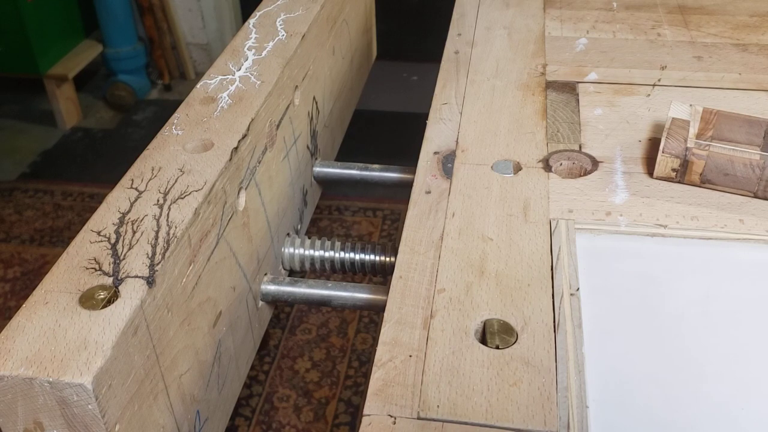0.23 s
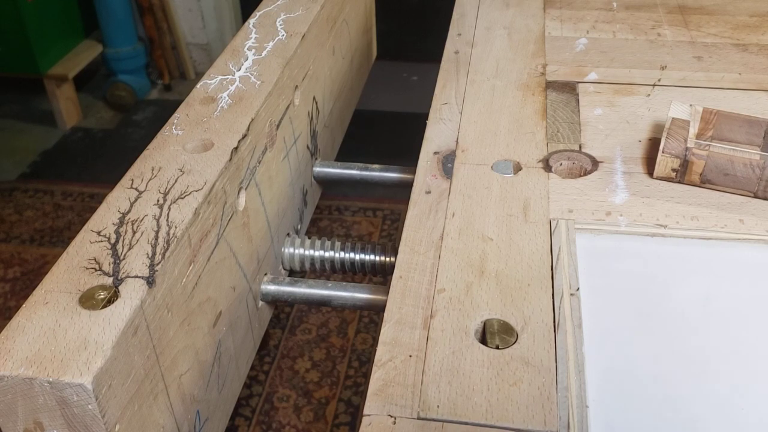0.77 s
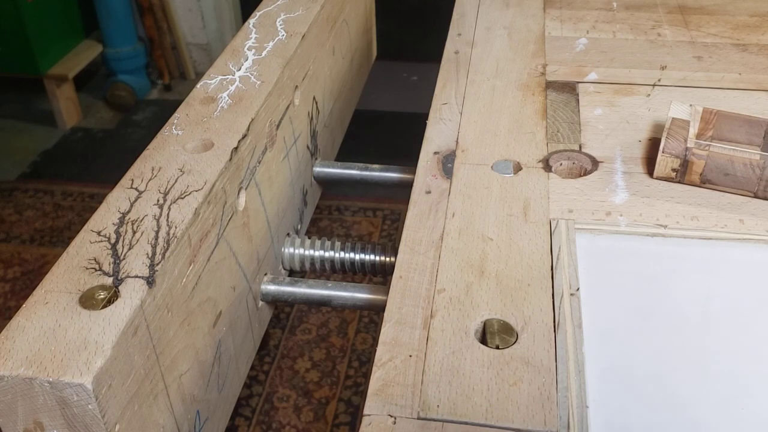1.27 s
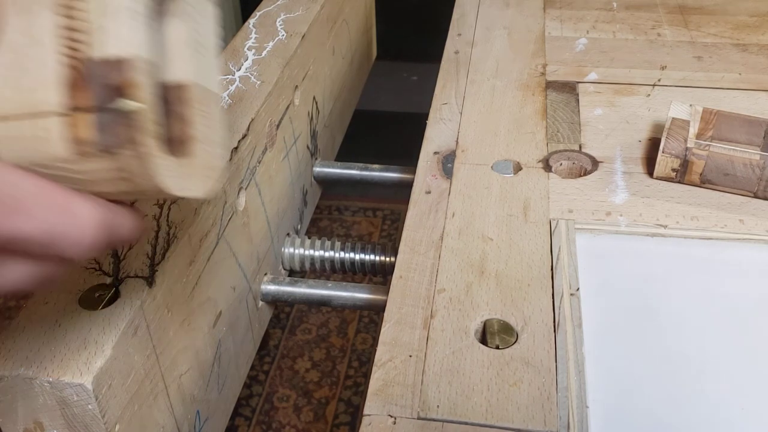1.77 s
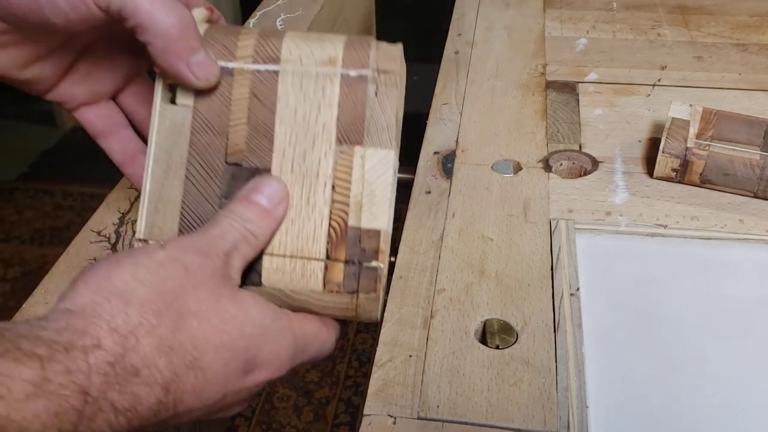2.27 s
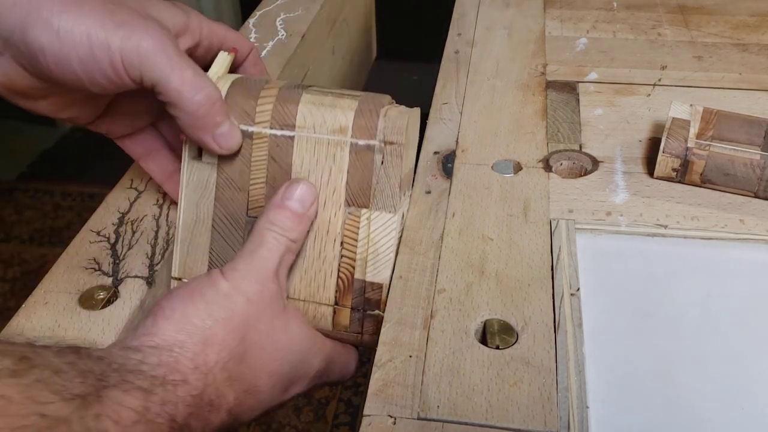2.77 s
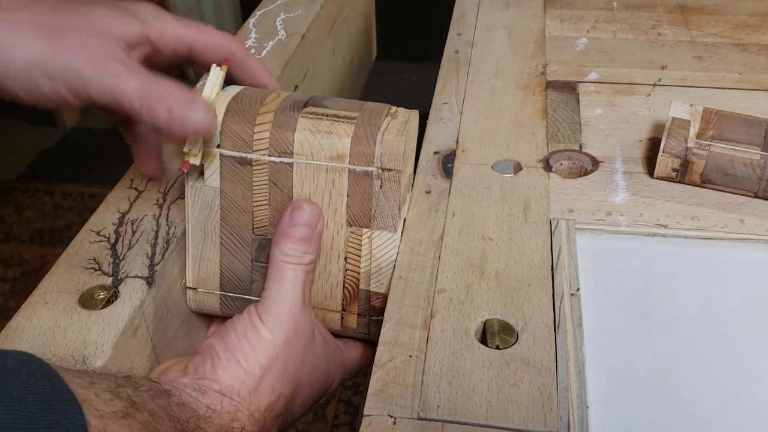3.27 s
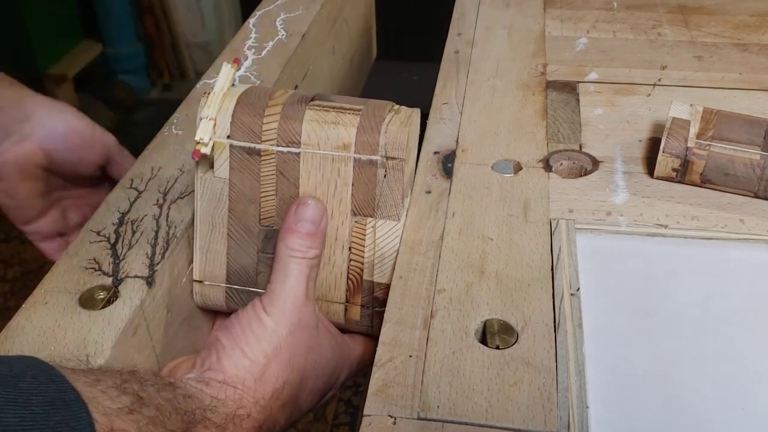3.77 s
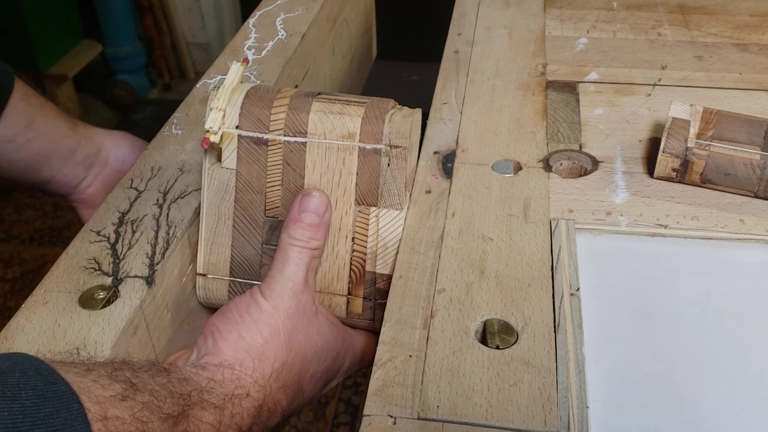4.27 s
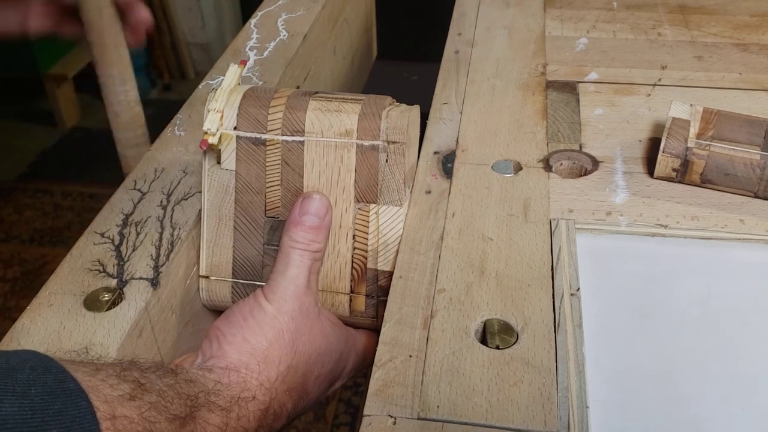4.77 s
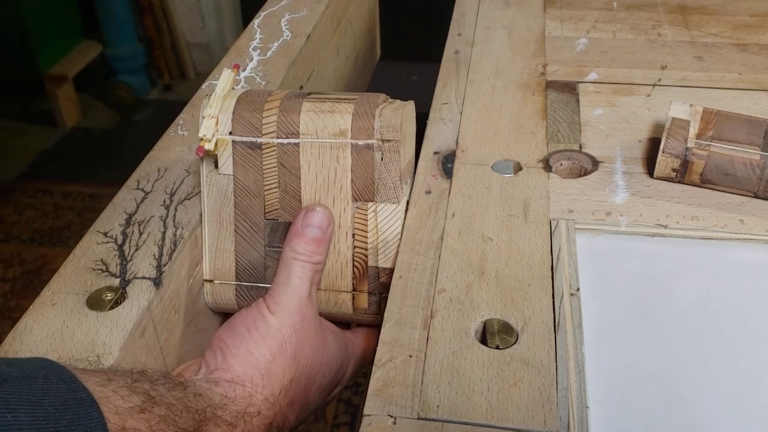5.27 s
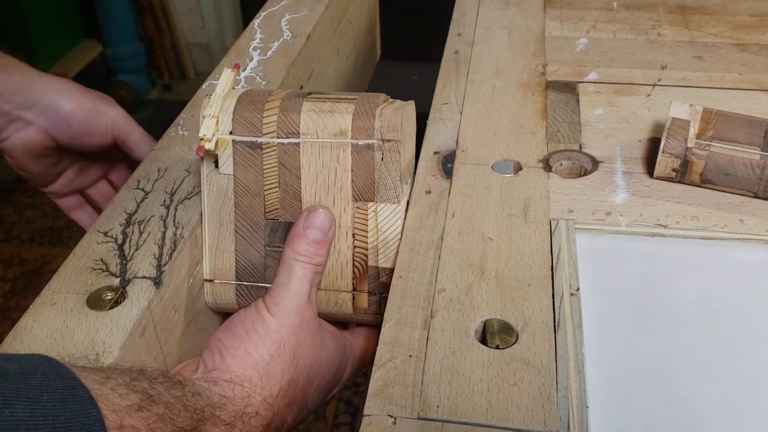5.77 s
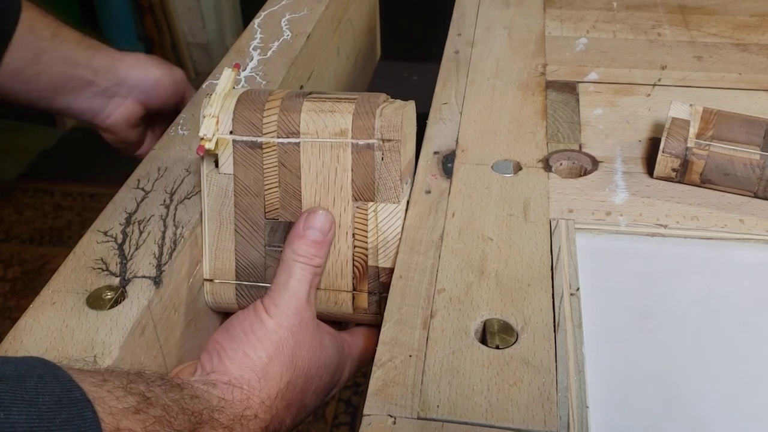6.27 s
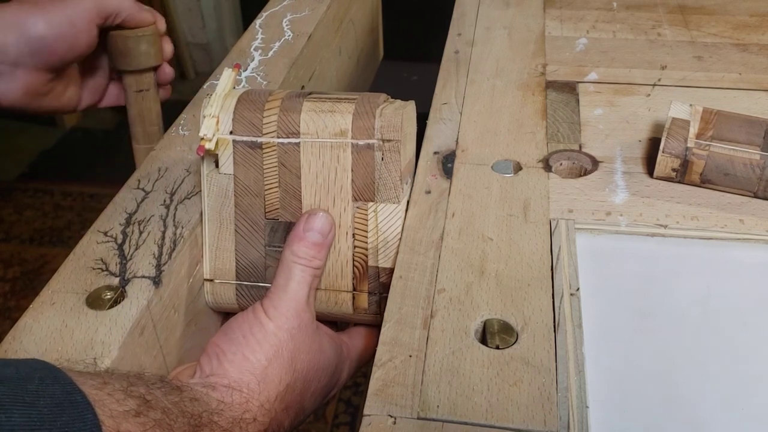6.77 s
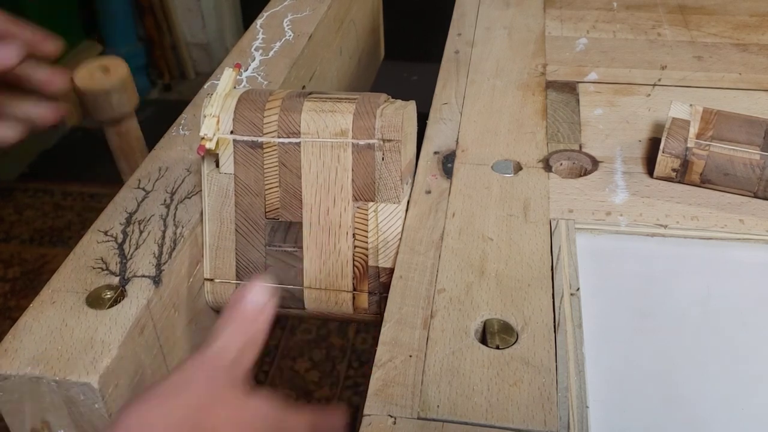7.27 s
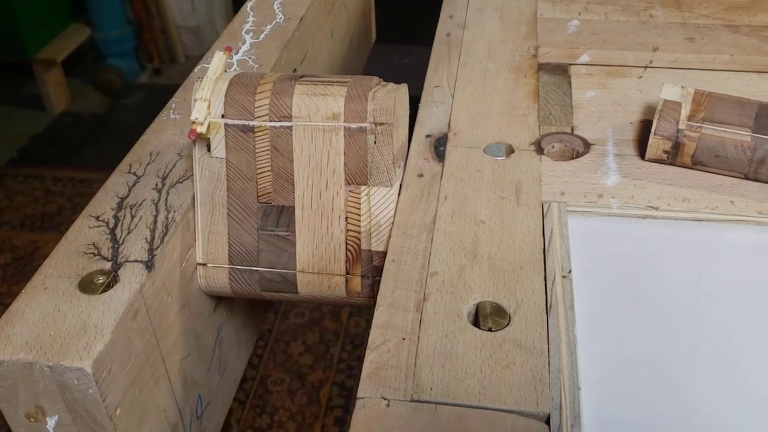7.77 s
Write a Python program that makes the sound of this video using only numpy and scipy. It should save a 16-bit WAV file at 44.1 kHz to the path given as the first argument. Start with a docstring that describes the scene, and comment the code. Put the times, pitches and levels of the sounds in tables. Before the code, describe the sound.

Over a low workshop hum, faint handling, a wooden tap, dull handle knocks, a rumbling screw scrape, then one loud wooden crack and small bounces.

```python
"""Wooden block in a workbench vise

Friction is dense random slips, filtered and gated by each movement; blows are scattered bursts plus
decaying modes. A block is handled and slid between the jaws over a low workshop hum. The vise screw is
turned twice with a scraping rumble and a faint whine of its thread; the wooden handle knocks and rubs in
its hub, slides through the hand, and at last drops against its end cap and bounces to rest."""
import sys
import numpy as np
from scipy import signal
from scipy.fft import rfft, irfft, next_fast_len
from scipy.io import wavfile

SR = 44100
rng = np.random.default_rng(int(sys.argv[2]) if len(sys.argv) > 2 else 0)


def transcribe(u):
    """Save the signal u as a 16-bit wav file named by the first command-line argument.

    u: samples, shape (n,) or (channels, n), limited to [-1, 1]; the rate is SR.
    q: integer samples, one column per channel.
    """
    v = np.clip(np.atleast_2d(u).T, -1, 1)
    q = np.round(v * 32767).astype(np.int16)
    wavfile.write(sys.argv[1], SR, q)


N = 353682
SIZE = next_fast_len(N, True)
TIME_S, FREQ_HZ = np.arange(N) / SR, np.fft.rfftfreq(SIZE, 1 / SR)

# Motor and mains hum. Each row: frequency in Hz, rms level in dB, waver in dB.
HUM = [(75.3, -45, 2), (119.9, -45, 1), (252.5, -62, 2.5)]
# Spectrum of the still workshop air. Each row: frequency in Hz, relative density in dB per Hz.
AIR = [(20, -25), (33, -22.5), (50, 1.5), (90, -1.5), (135, -5.5), (165, -10), (205, -12), (250, -11),
       (350, -20), (600, -29.5), (850, -30), (1500, -42.5), (3200, -50.5), (5300, -51), (7600, -65),
       (12500, -50), (16000, -51.5)]
# Left-right likeness of the air. Each row: frequency in Hz, correlation from -1 to 1.
AIR_ALIKE = [(60, 0.93), (130, 0.8), (290, 0.66), (640, 0.26), (1410, -0.28), (3100, -0.04), (6820, -0.19),
             (15000, 0.59)]

# Fingers on wood. Each row: frequency in Hz, relative level in dB.
RUB = [(600, -4), (1400, 2), (2350, 2), (3500, -4), (5000, -3), (6500, -7), (8000, -9), (16000, -25)]
# Hiss of dry skin. Each row: frequency in Hz, relative level in dB.
SKIN = [(3000, -30), (5000, -15), (7500, -24.5), (10000, -6.5), (13000, -6), (16000, -5)]
# Resonances of the hand-held block. Each row: frequency in Hz, -6 dB width in Hz, relative level in dB.
HELD = [(1390, 110, 3), (1930, 130, 4.5), (2440, 70, 2), (2840, 120, 6), (4700, 400, 3)]
# Fingers shifting on the block. Each row: start in seconds, length in seconds, rub level in dB,
# skin hiss level in dB, brightest frequency in Hz.
TOUCHES = [(0, .035, -63, -56, 4500), (.06, .1, -73, -75, 1400), (.22, .15, -70, -72, 1400),
           (.48, .11, -73, -67, 5500), (.612, .022, -60, -59, 2600), (.625, .05, -68, -67, 2000),
           (.79, .1, -70, -85, 2000), (.92, .06, -62, -68, 4700), (1.0, .1, -66, -76, 2500),
           (1.21, .05, -69, -66, 4700), (1.27, .06, -68, -66, 2800), (7.0, .13, -74, -74, 5000),
           (7.19, .045, -79, -78, 5000)]
# Small ticks of wood and fingers. Each row: time in seconds, level in dB, centre in Hz,
# distance to -6 dB in octaves.
TICKS = [(.622, -21, 3000, 1.1), (.624, -23, 12000, 0.43), (.659, -26, 9000, 1.3),
         (1.135, -30, 11000, 0.35), (1.322, -32, 10000, 1), (2.769, -1, 1470, .22),
         (2.770, -16, 3400, 0.58), (3.305, -22, 5500, .2), (3.305, -18, 2350, .1), (5.456, -28, 8350, 0.62),
         (5.577, -35, 7000, 0.69), (5.678, -32, 10600, 0.17)]

# Pushes of the block between the jaws. Each row: start in seconds, length in seconds, scuff level in dB,
# squeak level in dB.
PUSHES = [(2.27, .04, -76, -90), (2.42, .09, -77, -63), (2.5, .11, -63.5, -62), (2.64, .05, -67, -68),
          (2.755, .025, -59, -60), (2.78, .08, -68, -67), (2.87, .06, -66, -68), (2.99, .11, -76, -72),
          (3.16, .12, -71, -78), (3.28, .05, -67, -73)]
# Resonances of the block between the jaws. Each row: frequency in Hz, -6 dB width in Hz,
# relative level in dB.
BLOCK = [(1690, 160, -1.5), (2290, 110, -5), (2830, 180, -1), (3430, 260, -4), (3920, 150, -6),
         (4500, 400, -2), (5280, 350, -3), (4000, 3500, -9)]
# Groans of the block binding against a jaw. Each row: start in seconds, length in seconds, level in dB.
GROANS = [(2.44, .06, -40), (2.55, .1, -47)]

# Blows of the handle and jaw. Each row: time in seconds, force in dB, contact corner in Hz,
# fall above it in dB per octave, bench ring in dB, thud in Hz, thud level in dB,
# thud pan in dB left minus right, note of the struck part in Hz, note level in dB.
KNOCKS = [(4.153, -23, 4200, 10, -1, 89.4, -28.5, -4, 410, -34),
          (4.166, -22, 2400, 12, -6, 165, -33, 0, 1650, -38),
          (4.417, -10.5, 1080, 24, -14, 179, -36, 0, 560, -36),
          (4.431, -14, 1000, 20, -16, 171, -29, -6, 690, -32),
          (4.440, -8.5, 1400, 14, -22, 140, -24, -7, 870, -30),
          (4.447, -22, 1300, 20, -22, 272, -20, -6, 780, -35),
          (4.5575, -13.5, 1400, 12, -12, 180.5, -29, 3, 1130, -31),
          (5.299, -23, 1850, 28, 2, 170, -31, 0, 430, -33),
          (6.128, -27, 1600, 11, -8, 132, -40, 0, 1650, -48),
          (6.208, -9, 1600, 13, -9, 125, -38, 0, 670, -26),
          (6.221, -17, 1300, 14, -10, 165, -42, 0, 850, -32),
          (6.231, -16, 1300, 14, -10, 90, -32, 0, 700, -32),
          (7.392, -24, 800, 11, -10, 120, -42, 0, 860, -38),
          (7.419, -15, 1100, 12, -10, 160, -37, 0, 610, -29),
          (7.4537, 0.5, 14000, 5, -1, 132, -22, 0, 640, -18),
          (7.530, -11.5, 2400, 9, 6.5, 155, -24, 0, 2130, -26),
          (7.652, -42, 400, 20, 10, 165, -39, 0, 380, -48)]
# Modes of the bench and vise. Each row: frequency in Hz, relative level in dB, t60 in seconds.
BENCH = [(53, -31, .6), (258, -23, .35), (345.4, -19, .14), (381, -10.5, .15), (522, -23, 0.18),
         (646.5, -22, .15), (730, -29, .12), (861, -30, .12), (940, -26, .1), (1078, -30, .15),
         (1465, -33, .16), (1662, -29, 0.12), (2070, -30, .13), (2150, -33, .2), (2640, -34, .11),
         (3535, -28, 0.065), (3700, -35, .2), (3855, -28, .12), (4300, -27, .1), (4555, -24, 0.067),
         (4615, -26, .1), (4750, -25, 0.12), (5085, -27, .1)]
# Dense response of the wood between its modes. Each row: frequency in Hz, gain in dB.
WOOD = [(40, 1), (200, 15), (480, 15), (650, 23), (1100, 16.5), (1400, 19), (1850, 13.5), (2200, 17),
        (2900, 10), (4000, 18), (4900, 21), (6200, 10), (7500, -5), (10000, 3), (16000, -2)]

# Pulls on the vise handle and its last slide through the hub. Each row: start in seconds,
# length in seconds, time to full speed in seconds, scrape level in dB, rumble level in dB.
TURNS = [(4.18, .17, .1, -64, -38), (4.33, .15, .08, -58, -38), (4.56, .16, .05, -67, -44),
         (6.06, .06, .04, -56, -40), (6.105, .325, .035, -43, -28.5), (6.66, .14, .08, -61, -46),
         (6.99, .07, .03, -64, -44), (7.35, .09, .1, -45, -51)]
# Rough floor of the scrape. Each row: frequency in Hz, relative level in dB.
SCRAPE = [(150, -18), (300, -5), (520, 0), (800, 1), (1100, -1), (1750, -8), (2100, -18), (3300, -24),
          (4900, -24), (6000, -30), (7500, -42), (10000, -38), (16000, -42)]
# Resonances of the vise under the scrape. Each row: frequency in Hz, -6 dB width in Hz,
# relative level in dB.
VISE = [(377, 30, 13), (668, 70, 5), (1270, 100, -1), (1630, 140, -6), (2430, 80, -15), (2780, 100, -14),
        (3910, 130, -14), (4640, 220, -15), (5080, 110, -15)]
# Judder of the jaw. Each row: frequency in Hz, relative level in dB.
RUMBLE = [(20, -34), (45, -4), (90, 5), (130, -1), (175, 0.5), (250, -14), (400, -23.5), (900, -68.5)]
# Whine of the steel thread. Each row: frequency in Hz, level in dB.
THREAD = [(6498, -76), (8452, -78), (12721, -84)]

# Decay of the room. Each row: frequency in Hz, t60 in seconds.
ROOM_T60_S = [(100, 1), (300, 0.49), (1000, 0.24), (2200, .33), (4500, .26), (12000, .22)]
# Stereo balance of the bench sounds. Each row: frequency in Hz, left minus right in dB.
LEAN = [(25, 2), (60, 18.5), (130, 9), (380, 6), (700, -2), (1300, -4), (2400, 2.5), (4500, -4.5),
        (8000, 4), (15000, 3)]
# Left-right likeness of the bench sounds. Each row: frequency in Hz, correlation.
ALIKE = [(60, 0.6), (380, 0.5), (800, 0.4), (1500, 0.03), (16000, 0)]


def amp(db):
    """Decibels to gain."""
    return np.exp(np.asarray(db) * (np.log(10) / 20))


def unit(x):
    """Scales to rms 1."""
    return x / np.sqrt(np.mean(x ** 2) + 1e-20)


def read(points, hz):
    """Interpolates a table on a log-frequency axis."""
    table_hz, value = np.transpose(points)
    return np.interp(np.log(hz + 1), np.log(table_hz + 1), value)


def add(mix, start_s, sound):
    """Adds a stereo sound, cut at the end of the mix."""
    part = mix[:, round(start_s * SR):][:, :sound.shape[1]]
    part += sound[:, :part.shape[1]]


def shape(x, gain_db, size=4096):
    """Causal minimum-phase filter with the gain gain_db(hz), floored at -100 dB."""
    hz = abs(np.fft.fftfreq(size, 1 / SR))
    log_gain = np.log(amp(np.maximum(gain_db(hz), -100)))
    response = np.exp(np.conj(signal.hilbert(log_gain)))  # phase follows from log gain
    taps = np.fft.ifft(response).real[:size // 2]
    return signal.oaconvolve(x, taps[None], axes=1)[:, :x.shape[1]]


def pair(x, alike):
    """Correlates two unrelated channels by a likeness table over frequency."""
    size = next_fast_len(x.shape[1] + SR // 10, True)
    left, other = rfft(x, size)
    same = np.clip(read(alike, np.fft.rfftfreq(size, 1 / SR)), -1, 1)
    right = same * left + np.sqrt(1 - same ** 2) * other
    return irfft(np.array([left, right]), size)[:, :x.shape[1]]


def colour(x, gain_db):
    """Filters a full-length sound by gain_db, at rms 1."""
    return unit(irfft(rfft(x, SIZE) * amp(gain_db), SIZE)[..., :N])


def drift(rate_hz, size=4096):
    """Slow noise of rms 1 with a Gaussian spectrum reaching to about rate_hz."""
    hz = np.fft.rfftfreq(size, N / SR / size)
    slow = irfft(rfft(rng.standard_normal(size)) * np.exp(-(hz / rate_hz) ** 2))
    return np.interp(TIME_S, np.linspace(0, N / SR, size), unit(slow))


def resonances(modes):
    """Summed power spectrum of (Hz, width Hz, dB) resonances."""
    return sum(amp(db) ** 2 / (1 + ((FREQ_HZ - hz) / width_hz * 2) ** 2) ** 2
               for hz, width_hz, db in modes)


def mode(hz, db, t60_s, size=20000):
    """One vibration decaying exponentially, with a cosine fade to zero."""
    t = np.arange(size) / SR
    fade = np.cos(np.pi / 2 * t / t[-1])
    return amp(db - 60 * t / t60_s) * np.sin(2 * np.pi * hz * t) * fade


def stroke(start_s, length_s, rise_s, t60_s):
    """Gain of one movement: gathers speed, holds to the end of its length, dies away."""
    t = TIME_S - start_s
    attack = np.sin(np.pi / 2 * np.clip(t / rise_s, 0, 1)) ** 2
    return attack * amp(-60 * np.clip((t - length_s) / t60_s, 0, 2))


def spread(near_t60_s, near_db, room_db, direct_db, size=20000):
    """Stereo response of one impulse, its quick scatter around the bench, and the room tail."""
    t = np.arange(size) / SR
    near, far = rng.standard_normal((2, 2, size))
    near = near * amp(-60 * t / near_t60_s)
    hz, frame_s, bins = signal.stft(far, SR, nperseg=256)
    decay = amp(-60 * frame_s / read(ROOM_T60_S, hz)[:, None])
    far = signal.istft(bins * decay, SR, nperseg=256)[1][:, :size]
    far = far * (1 - np.exp(-t / 0.0024))  # tail builds up in ms
    out = pair(amp(near_db) * unit(near) + amp(room_db) * unit(far), ALIKE) / np.sqrt(size)
    out[:, 0] += amp(direct_db)
    return out


def grains(per_s, spread_db, clump_hz, clump_db):
    """Friction: tiny slips of uneven size and clumped strength, scattered by the bench and the room."""
    uneven_db = spread_db * np.minimum(rng.exponential(1, N), 4)
    size = amp(uneven_db + clump_db * drift(clump_hz))
    slips = rng.standard_normal(N) * size * (rng.random(N) < per_s / SR)
    paths = spread(near_t60_s=.06, near_db=-3, room_db=-5, direct_db=-5)
    return signal.oaconvolve(slips[None], paths, axes=1)[:, :N]


def workshop():
    """Sines of wavering level over the soft rush of coloured stereo noise."""
    air_db = -47
    hum = 0
    for hz, db, waver_db in HUM:
        tone = unit(np.sin(2 * np.pi * (hz * TIME_S + rng.random())))
        hum = hum + amp(db + waver_db * drift(3.4)) * tone
    air = colour(pair(rng.standard_normal((2, N)), AIR_ALIKE), read(AIR, FREQ_HZ))
    return hum + amp(air_db) * air


def pushing():
    """Gains over time of the block's scuff and of its squeak: one stroke per push."""
    rise_share, t60_s = .7, .25  # rise as a share of push length
    return sum(np.outer(amp(levels_db), stroke(start_s, length_s, rise_share * length_s, t60_s))
               for start_s, length_s, *levels_db in PUSHES)


def hands():
    """Dry skin slips over the block, coloured by each grip, and hisses along the handle."""
    rise_share, fade_share = .6, 3.5  # rise and fade t60, in touch lengths
    grip_db, grip_octaves = 6, .3  # each grip favours one band of the rub
    push_hiss_db = -11  # relative to the push's scuff
    held_db = 10 * np.log10(amp(read(RUB, FREQ_HZ)) ** 2 + resonances(HELD))
    rub = colour(grains(per_s=4000, spread_db=2, clump_hz=35, clump_db=0.5), held_db)
    hiss = colour(grains(per_s=12000, spread_db=1, clump_hz=35, clump_db=0.5), read(SKIN, FREQ_HZ))

    # the handle glides through the hand
    glide = amp(-55) * stroke(start_s=4.66, length_s=.245, rise_s=.14, t60_s=.24)
    out = hiss * (glide + amp(push_hiss_db) * pushing()[0])
    for start_s, length_s, rub_db, hiss_db, bright_hz in TOUCHES:
        end_s = start_s + length_s * (1 + fade_share)
        span = slice(round(start_s * SR), round(end_s * SR))

        def grip_gain_db(hz):
            octaves = np.log2((hz + 1) / bright_hz)
            return grip_db * np.exp(-(octaves / grip_octaves) ** 2)

        gripped = unit(shape(rub[:, span], grip_gain_db))
        speed = stroke(start_s, length_s, rise_share * length_s, fade_share * length_s)[span]
        out[:, span] += speed * (amp(rub_db) * gripped + amp(hiss_db) * hiss[:, span])
    return out


def ticks():
    """Light touches: band-shaped impulses, each with a short room tail."""
    out = np.zeros((2, N))
    for start_s, db, centre_hz, octaves in TICKS:
        touch = spread(near_t60_s=.03, near_db=-6, room_db=-8.5, direct_db=-14)
        tick = shape(touch, lambda hz: db - 6 * (np.log2((hz + 1) / centre_hz) / octaves) ** 2)
        add(out, start_s, tick)
    return out


def block():
    """Slips excite waxing and waning resonances of the block; it groans and squeaks where it binds."""
    slips = grains(per_s=4000, spread_db=1.5, clump_hz=35, clump_db=1.5)
    spectrum = rfft(slips, SIZE)
    scuff = 0
    for row in BLOCK:
        ringing = irfft(spectrum * np.sqrt(resonances([row])), SIZE)[:, :N]
        scuff = scuff + amp(3.5 * drift(8)) * ringing
    groan_hz = 165 + 5 * drift(25.5)
    groan = np.sin(2 * np.pi * np.cumsum(groan_hz) / SR)
    squeak = colour(slips, 10 * np.log10(resonances([(1440, 150, 0), (300, 500, 1)])))
    scuffing, squeaking = pushing()
    binding = sum(amp(db) * stroke(start_s, length_s, rise_s=.04, t60_s=.3)
                  for start_s, length_s, db in GROANS)
    return unit(scuff) * scuffing + groan * binding + squeak * squeaking


def knocks(size=20000):
    """Each blow rings the bench and thuds in its frame; softer contacts lose the treble."""
    out = np.zeros((2, N))
    swell = 1 - np.exp(-np.arange(size) / SR / .003)  # heavy wood takes a moment to start moving
    rings = np.array([mode(*row) for row in BENCH])
    bench_hz = np.array(BENCH)[:, 0]
    for (start_s, force_db, corner_hz, fall_db_per_octave, ring_db,
         thud_hz, thud_db, pan_db, note_hz, note_db) in KNOCKS:

        def contact_db(hz):
            return force_db - 10 * np.log10(1 + (hz / corner_hz) ** (fall_db_per_octave / 3))

        scatter = spread(near_t60_s=.07, near_db=-2.5, room_db=-4.5, direct_db=-13)
        wood = shape(scatter, lambda hz: read(WOOD, hz) + contact_db(hz))
        ring = amp(ring_db + contact_db(bench_hz)) @ rings
        sides = amp(np.array([[.5], [-.5]]) * pan_db)
        thud = mode(thud_hz, thud_db, t60_s=.24) * sides
        note = mode(note_hz, note_db, t60_s=.08)
        add(out, start_s, wood + swell * (ring + thud + note))
    return out


def screw():
    """The thread scrapes in its nut and whines faintly while the jaw judders along its rods."""
    scrape_t60_s, rumble_t60_s = .17, .5  # scrape stops quickly, the jaw shakes on
    vise_db = 10 * np.log10(amp(read(SCRAPE, FREQ_HZ)) ** 2 + resonances(VISE))
    scrape = colour(grains(per_s=1000, spread_db=1, clump_hz=40, clump_db=2), vise_db)
    judder = colour(pair(rng.standard_normal((2, N)), ALIKE), read(RUMBLE, FREQ_HZ))
    scraping, shaking = 0, 0
    for start_s, length_s, rise_s, scrape_db, rumble_db in TURNS:
        scraping = scraping + amp(scrape_db) * stroke(start_s, length_s, rise_s, scrape_t60_s)
        shaking = shaking + amp(rumble_db) * stroke(start_s, length_s, rise_s, rumble_t60_s)

    # the thread sings under the hardest pull
    whine_start_s, sag_db_per_s = 6.205, 20
    whine = 0
    for hz, db in THREAD:
        phase = 2 * np.pi * np.cumsum(hz + 25 * drift(90)) / SR
        whine = whine + amp(db + 2.7 * drift(25)) * np.sin(phase)
    sag = amp(-sag_db_per_s * np.maximum(TIME_S - whine_start_s, 0))
    singing = sag * stroke(whine_start_s, length_s=.355, rise_s=.02, t60_s=.08)
    return scrape * scraping + judder * shaking + whine * singing


def hub():
    """The handle rubs hollowly in its hub as it swings over the top: noise through one resonance."""
    centre_s, half_length_s, hz, width_hz, db = 6.755, .05, 650, 130, -59
    hollow = colour(rng.standard_normal(N), 10 * np.log10(resonances([(hz, width_hz, 0)])))
    return amp(db) * hollow * np.exp(-((TIME_S - centre_s) / half_length_s) ** 2)


def end_cap_crack():
    """The end cap is struck hard: one very short mode, equal in both channels."""
    out = np.zeros((2, N))
    crack = mode(hz=4550, db=-7, t60_s=.016)
    add(out, 7.4537, np.array([crack, crack]))
    return out


def scene():
    """Bench sounds get a frequency-dependent stereo balance; the workshop is added as is."""
    bench = hands() + ticks() + block() + knocks() + screw() + hub() + end_cap_crack()
    sides = amp(np.array([[.5], [-.5]]) * read(LEAN, FREQ_HZ))
    sides = sides / np.sqrt(np.mean(sides ** 2, axis=0))  # keeps mean power of the channel gains at 1
    return irfft(rfft(bench, SIZE) * sides, SIZE)[:, :N] + workshop()


def record(dry):
    """Full-scale limit, then a linear-phase low-pass."""
    edge_hz = 15850
    taps = signal.firwin(511, edge_hz, window=("kaiser", 9), fs=SR)
    return signal.oaconvolve(np.clip(dry, -1, 1), taps[None], "same")


dry = scene()
out = record(dry)
transcribe(out)
```